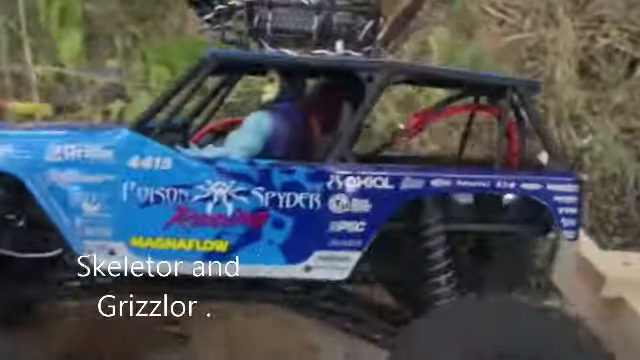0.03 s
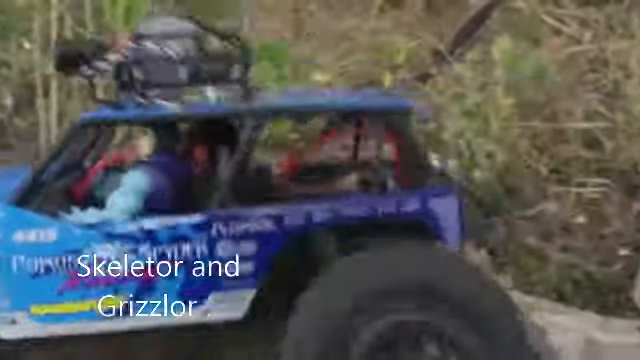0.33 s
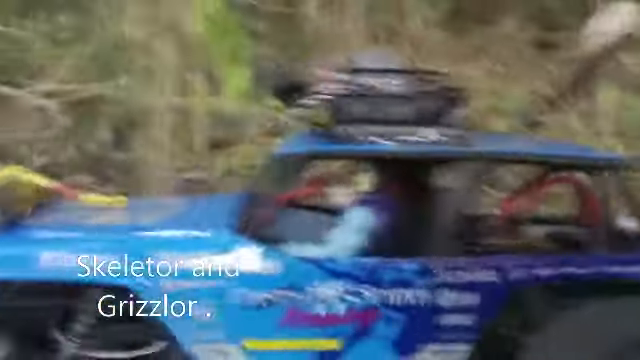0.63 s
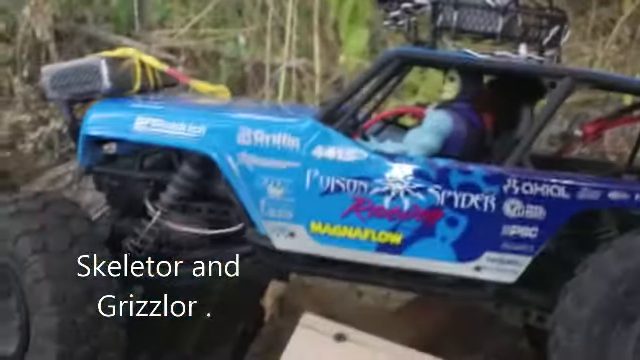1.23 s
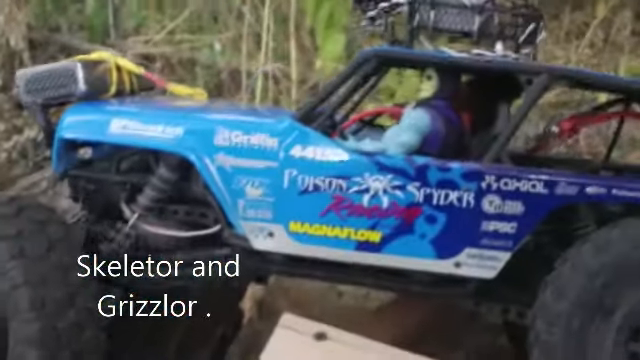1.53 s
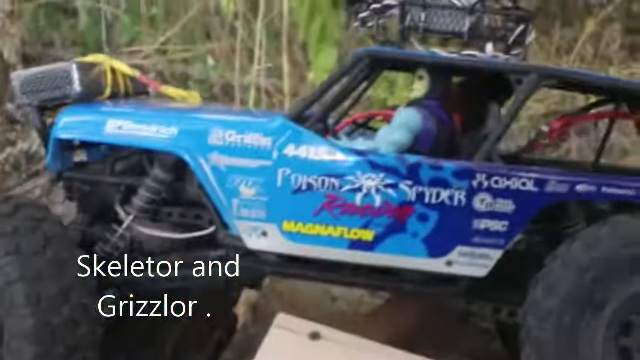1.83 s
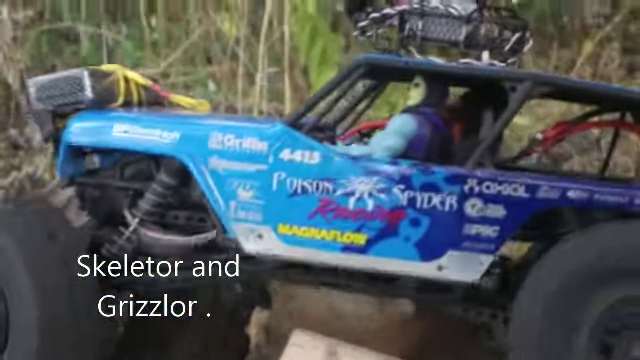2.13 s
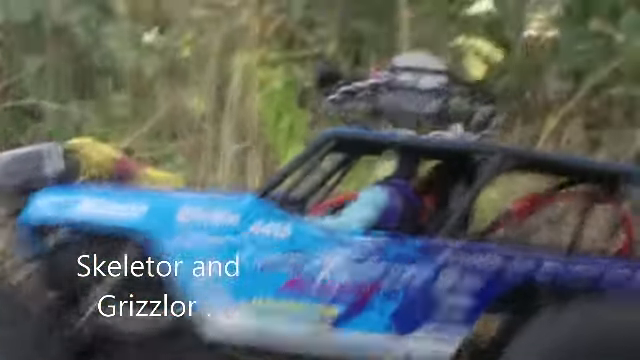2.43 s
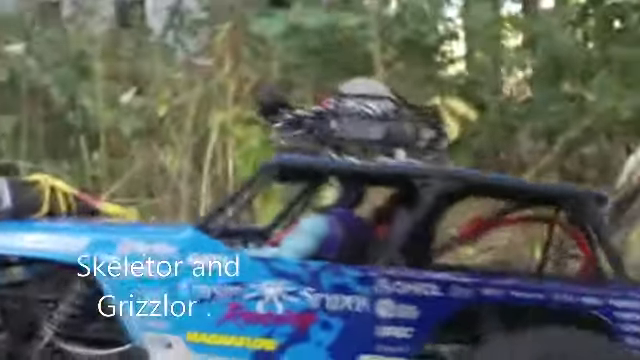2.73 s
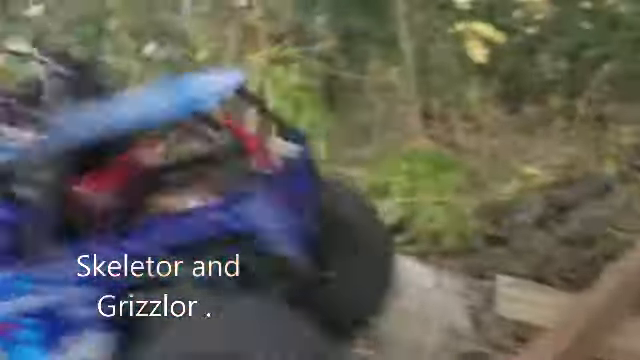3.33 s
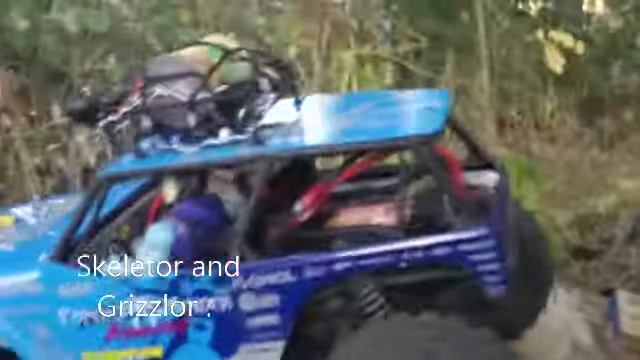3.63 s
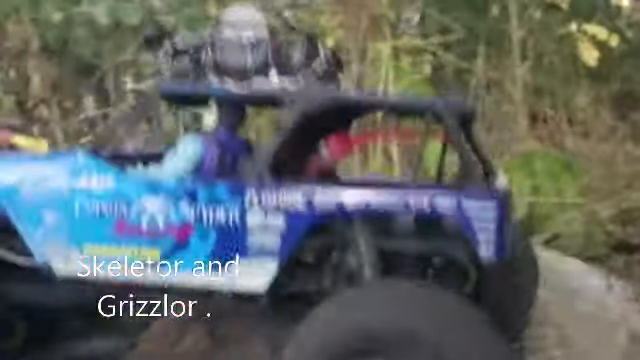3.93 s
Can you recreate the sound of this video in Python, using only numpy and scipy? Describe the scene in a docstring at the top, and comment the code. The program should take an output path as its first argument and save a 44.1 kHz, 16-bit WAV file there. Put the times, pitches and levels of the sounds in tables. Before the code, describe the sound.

A radio-controlled truck clatters over logs outdoors, close by. Short gear whirrs, tyre scrubbing and hollow knocks fill the first second. It then rests until about 2 seconds, leaving a quiet hush, a thin whine and one faint squeak. Knocking resumes with light rustling, a small clink at 2.6 and sharp snaps near 2.9. The gears whirr again at 3 and 3.8, before final knocks and a brief tyre judder.

```python
"""Outdoors, a radio-controlled crawler climbs over logs close to the microphone.
Its meshing gears whirr in short bursts of throttle and its speed controller whines. Impacts on the
wood ring the chassis; wood and plastic snap, tyres scrub and rumble, dry litter rustles.
It rests for a second over a quiet hush, with one faint squeak, then climbs on:
a small metal part clinks, and at the end a tyre judders by stick-slip friction."""
import sys
import numpy as np
from scipy import signal
from scipy.fft import rfft, irfft
from scipy.io import wavfile
from scipy.ndimage import uniform_filter1d

SR = 44100
rng = np.random.default_rng(int(sys.argv[2]) if len(sys.argv) > 2 else 0)


def log_audio(samples):
    """Write samples as a 16-bit WAV file to the path given in sys.argv[1]."""
    # one column per channel
    frames = np.atleast_2d(samples).T
    # limit to full scale, then quantise
    limited = np.clip(frames, -1, 1)
    pcm = np.round(limited * 32767).astype(np.int16)
    wavfile.write(sys.argv[1], SR, pcm)


N = 176400


def undb(db):
    """Decibels to amplitude ratio."""
    return 10 ** (np.asarray(db) / 20)


def unit(x):
    """Normalisation to rms 1."""
    return x / np.sqrt(np.mean(x ** 2) + 1e-20)


def colour(x, points):
    """Spectral shaping by a curve of (Hz, dB) points."""
    hz, db = np.array(points).T
    f = np.maximum(np.fft.rfftfreq(len(x), 1 / SR), 1)
    return irfft(rfft(x) * undb(np.interp(np.log(f), np.log(hz), db)), len(x))


def band(x, lo_hz, hi_hz):
    """Causal band-pass filtering."""
    return signal.sosfilt(signal.butter(2, [lo_hz, hi_hz], "band", fs=SR, output="sos"), x)


def walk(per_s):
    """Smoothed random steps: a slow wander of rms 1."""
    hold = max(int(SR / per_s), 1)
    steps = np.repeat(rng.standard_normal(N // hold + 1), hold)
    return unit(uniform_filter1d(uniform_filter1d(steps, hold), hold)[:N])


def fade(t, t60):
    """Exponential decay, by 60 dB in t60 seconds."""
    return np.exp(-np.log(1000) * t / t60)


def add(out, start_s, x):
    """Superposition of a short sound at its start time."""
    i = int(start_s * SR)
    out[i:i + len(x)] += x[:max(N - i, 0)]


def grains(per_s, spread_db):
    """Shot noise: random clicks of uneven size."""
    size = undb(spread_db * np.minimum(rng.exponential(size=N), 4))
    return unit((rng.random(N) < per_s / SR) * size * rng.choice([-1, 1], N))


# One list per burst of throttle. Each row: time in seconds, mesh frequency in Hz, relative level in dB.
THROTTLE_BURSTS = [
    [(0, 537.6, -44), (.03, 495.3, -37), (.062, 382.3, -46), (.11, 478, -43.5), (.15, 504, -46),
     (.22, 649, -33.5), (.255, 767, -40), (.282, 873, -37.5), (.325, 785, -36)],
    [(.745, 785.5, -45.5), (.765, 800, -33), (.79, 736, -38.5), (.825, 528, -37)],
    [(2.995, 845.6, -40), (3.012, 915, -29.5), (3.03, 880, -34), (3.053, 977, -32.5), (3.088, 791.4, -39),
     (3.118, 978.5, -29), (3.145, 1091, -41), (3.177, 1244, -31.5), (3.22, 1179, -34), (3.28, 874, -48)],
    [(3.75, 424, -50), (3.785, 462.4, -57), (3.815, 594.6, -46), (3.847, 764, -41), (3.915, 798, -38.5)],
]
# Each row, one per burst: lift of the fundamental in dB, gain of the tooth rattle in dB.
BURST_TONE = [(-2, -12), (0.5, -8), (1.5, -19), (9, -9)]
# Each entry: relative level of a mesh harmonic in dB, from the fundamental up.
MESH_HARMONICS_DB = [0, 1, -4, -7.5, -14, -19]
# Gearbox response. Each row: frequency in Hz, gain in dB.
GEARBOX_RESPONSE = [(300, -30), (560, 1), (700, -2), (950, 3), (1350, 7), (1620, 0), (1900, -2),
                    (2150, -7.5), (2520, -1), (3200, -5.5), (3700, -5), (4300, -17.5), (4800, -3),
                    (5200, -18), (8000, -13)]
# Each entry: offset of a sideband from the switching tone, in multiples of the rotor's speed.
BUZZ_ORDERS = [-4, -3, -2, -1, 1]
PINION_TEETH, WOBBLE_RAD, TOOTH_SCATTER_RAD = 7, .19, .09
GEAR_DB, GEAR_ROUGHNESS, GEAR_JITTER, GEAR_FADE_S = -4, .43, .009, .015
SWITCHING_HZ, BUZZ_DB = 5912, -56


def geared_motor(t):
    """Gear-mesh harmonics, phase-modulated by a wobbling pinion; teeth rattle and the windings buzz."""
    out = np.zeros(N)
    box_hz, box_db = np.array(GEARBOX_RESPONSE).T
    switching = 2 * np.pi * SWITCHING_HZ * t
    for burst, (lift_db, teeth_db) in zip(THROTTLE_BURSTS, BURST_TONE):
        times, hz, db = np.array(burst).T
        pitch = np.interp(t, times, hz) * (1 + GEAR_JITTER * walk(250))
        phase = 2 * np.pi * np.cumsum(pitch) / SR
        phase += TOOTH_SCATTER_RAD * walk(900)  # uneven teeth blur the high harmonics
        rotor = phase / PINION_TEETH
        wobble = WOBBLE_RAD * (np.sin(rotor) + walk(40) * np.sin(2 * rotor) / 2)
        mesh = np.zeros(N)
        for k, harmonic_db in enumerate(MESH_HARMONICS_DB, 1):
            response_db = np.interp(np.log(k * pitch), np.log(box_hz), box_db)
            gain = undb(harmonic_db + lift_db * (k == 1) + response_db)
            mesh += gain * (1 + GEAR_ROUGHNESS * walk(300)) * np.sin(k * (phase + wobble))
        contacts = rng.standard_normal(N) * (1 + np.cos(phase)) * undb(2.3 * walk(250))
        teeth = unit(colour(contacts, GEARBOX_RESPONSE))
        gears = undb(np.interp(t, times, db)) * (undb(GEAR_DB) * mesh + undb(teeth_db) * teeth)
        buzz = unit(sum((1 + walk(60) / 2) * np.sin(switching + k * rotor) for k in BUZZ_ORDERS))
        outside_burst_s = np.maximum(times[0] - t, 0) + np.maximum(t - times[-1], 0)
        out += np.exp(-outside_burst_s / GEAR_FADE_S) * (gears + undb(BUZZ_DB) * buzz)
    return out


# Tyres on bark. Each row: time in seconds, relative levels of the scrub and of the rumble in dB.
TYRE_LEVELS = [(0, -46, -56.5), (.3, -40, -56.5), (.36, -29.5, -46), (0.45, -44.5, -52),
               (.55, -34.5, -47.5), (.64, -45, -60), (.78, -39.5, -53.5), (.98, -42.5, -57),
               (1.12, -58, -59), (1.95, -55.5, -61.5), (2.11, -35, -56), (2.22, -53, -53.5),
               (2.52, -43, -69), (2.7, -40, -50), (2.8, -42.5, -56), (3.0, -31.5, -47), (3.15, -40, -58.5),
               (3.31, -36.5, -51.5), (3.42, -44.5, -53.5), (3.58, -52.5, -61), (3.8, -45.5, -59),
               (4, -34.5, -49.5)]
# Spectra of the scrub and the rumble. Each row: frequency in Hz, gain in dB.
SCRUB_SPECTRUM = [(300, -20.5), (480, 5.5), (750, -2.5), (1050, 5.5), (1500, -10.5), (2200, -10.5),
                  (3500, -20.5), (7000, -19.5), (15000, -29.5)]
RUMBLE_SPECTRUM = [(40, -20), (100, 3.5), (170, 7.5), (300, 2.5), (420, -6), (800, -20)]
SCRUB_GAIN_DB, RUMBLE_GAIN_DB = -5, 1.5


def tyres(t):
    """Rolling and friction noise: tread blocks patter and scrub on bark, and the soft tyres rumble."""
    times, scrub_db, rumble_db = np.array(TYRE_LEVELS).T
    tread = grains(per_s=500, spread_db=1.5) + .46 * rng.standard_normal(N)
    scrub = unit(colour(tread, SCRUB_SPECTRUM))
    scrub *= undb(np.interp(t, times, scrub_db) + SCRUB_GAIN_DB)
    rumble = unit(colour(rng.standard_normal(N), RUMBLE_SPECTRUM))
    rumble *= undb(np.interp(t, times, rumble_db) + RUMBLE_GAIN_DB)
    return scrub + rumble


# Spectrum of the background. Each row: frequency in Hz, gain in dB.
HUSH_SPECTRUM = [(15, -50), (25, -14.5), (331, -3.5), (509, -4.5), (741, -7), (945, -7.5), (4260, -17),
                 (5730, -17), (7910, -14), (9300, -17), (15500, -23.5)]
HUSH_DB = -50


def hush():
    """Broadband noise floor: nearly steady outdoor air and microphone hiss."""
    return undb(HUSH_DB + .92 * walk(6.87)) * unit(colour(rng.standard_normal(N), HUSH_SPECTRUM))


# Chassis and wheels strike the logs.
# Each row: start in seconds, then relative levels in dB of four parts: body, thump, clack and crack.
KNOCKS = [(0.327, -7.5, -21.5, -24, -34.5), (0.393, -25, -46, -38, -48), (0.487, -27.5, -60, -40.5, -47),
          (0.518, -18.5, -42, -38.5, -45), (0.55, -24, -39, -42, -48), (0.696, -32, -49, -43.5, -50),
          (0.833, -13.5, -37.5, -27, -34.5), (0.903, -10.5, -36, -27.5, -32.5),
          (0.966, -14.5, -43.5, -30, -36), (2.064, -15, -36.5, -27, -33),
          (2.162, -10.5, -38.5, -23.5, -26.5), (2.565, -15.5, -42.5, -29.5, -38.5),
          (2.595, -19.5, -49, -32.5, -38.5), (2.659, -20.5, -51, -41.5, -50),
          (2.834, -11.5, -38.5, -23, -30), (2.957, -10, -42.5, -23.5, -29.5), (3.027, -20, -42, -40, -53),
          (3.207, -17, -41.5, -33, -43), (3.34, -22, -57, -38, -41.5), (3.459, -20, -46, -32.5, -39),
          (3.923, -16.5, -49, -28.5, -36.5), (3.937, -18, -41, -29.5, -55)]
# Each row, one per part: lower and upper band edge in Hz.
KNOCK_BANDS = [(425, 1180), (210, 530), (1428, 2530), (3850, 9060)]
# Each row, one per part: gain in dB, t60 of the rattle in seconds, rattle against modes in dB.
KNOCK_PARTS = [(-12, 0.068, -2), (0.5, 0.092, 0), (-0.5, .03, -8), (-3, 0.027, 9)]
# Modes of chassis and shell. Each row: frequency in Hz, relative level in dB, t60 in seconds.
SHELL_MODES = [(240, -11, 0.14), (300, -8, 0.094), (423, -7.5, 0.098), (495, 1.5, 0.048), (619, -2, 0.061),
               (770, -4, 0.022), (956, -1.5, 0.037), (1243, 0, 0.063), (1537, 5.5, 0.053),
               (1730, 11, 0.031), (1900, 3.5, 0.054), (2320, -12.5, 0.027)]
KNOCK_RISE_S, KNOCK_LAG_S, KNOCK_SPAN_S = .0013, .0006, .019
MODE_SCATTER_DB, MODE_DETUNE, TAIL_DB, TAIL_T60_S = 3.5, .019, -29.5, .26


def knocks(t):
    """Modal ringing: each blow excites the shell and shakes loose parts, coloured by where it lands."""
    out, age = np.zeros(N), t[:N // 12]
    hz, db, t60 = np.array(SHELL_MODES).T[:, :, None]
    rise = 1 - np.exp(-age / KNOCK_RISE_S)
    span_gain = np.sqrt(KNOCK_SPAN_S / age[-1])  # gives the energy of rms 1 held for the span
    for start, *levels in KNOCKS:
        size, detune = rng.standard_normal((2, len(SHELL_MODES), 1))
        strength = rng.choice([-1, 1], size.shape) * undb(db + MODE_SCATTER_DB * size)
        mode_hz = hz * (1 + MODE_DETUNE * detune)
        ring = np.sum(strength * fade(age, t60) * np.sin(2 * np.pi * mode_hz * age), axis=0)
        noise = rng.standard_normal(len(age))
        for edges, level_db, (gain_db, rattle_t60, rattle_db) in zip(KNOCK_BANDS, levels, KNOCK_PARTS):
            rattle = noise * (fade(age, rattle_t60) + undb(TAIL_DB) * fade(age, TAIL_T60_S))
            part = unit(band(rise * ring, *edges)) + undb(rattle_db) * unit(band(rise * rattle, *edges))
            add(out, start + KNOCK_LAG_S, unit(part) * span_gain * undb(level_db + gain_db))
    return out


# Dry snaps and thuds. Each row: start in seconds, relative level in dB, pitch in Hz, t60 in seconds,
# click against ring in dB.
SNAPS = [(0.3292, -15, 1270, 0.0054, 0), (0.65, -29.5, 1440, .016, -5), (2.704, -31, 460, .03, -15),
         (2.7919, -24.5, 790, 0.017, -7), (2.911, -15, 580, 0.017, -32), (2.9417, -6.5, 1050, 0.0074, 5),
         (3.924, -16.5, 2480, 0.024, -8), (3.9243, -17.5, 2830, 0.02, -16)]
CLICK_HZ, CLICK_T60_S, CLICK_CRACK_DB = 3830, .00076, -16.5


def snaps(t):
    """Heavily damped vibration: contacts of wood and plastic ring briefly under a sharp click."""
    out, age = np.zeros(N), t[:N // 80]
    for start, db, hz, t60, click_db in SNAPS:
        crack = unit(band(rng.standard_normal(len(age)), 3100, 14000)) * fade(age, t60=.004)
        pulse = np.sin(2 * np.pi * CLICK_HZ * age) * fade(age, CLICK_T60_S)
        click = undb(CLICK_CRACK_DB) * crack - pulse
        ring = np.sin(2 * np.pi * hz * age) * fade(age, t60)
        add(out, start, undb(db) * (ring + undb(click_db) * click))
    return band(out, 280, 11000)


# Whine of the speed controller. Each row: time in seconds, rms level of the fundamental in dB.
WHINE_LEVELS = [(.52, -72), (.62, -64), (.9, -75), (1.04, -61.5), (1.4, -68.5), (1.95, -74), (2.02, -58.5),
                (2.25, -58.5), (2.95, -63.5), (3.1, -67), (3.55, -63.5), (3.8, -74)]
WHINE_WAVER_HZ, WHINE_FLUTTER_DB, WHINE_OCTAVE_DB = 3, 1.5, -9.5


def controller(t):
    """Periodic switching: a thin whine and its octave swell and fade, clearest between throttle bursts."""
    times, db = np.array(WHINE_LEVELS).T
    phase = 2 * np.pi * np.cumsum(SWITCHING_HZ + WHINE_WAVER_HZ * walk(50.2)) / SR
    rms = undb(np.interp(t, times, db) + WHINE_FLUTTER_DB * walk(30))
    return np.sqrt(2) * rms * (np.sin(phase) + undb(WHINE_OCTAVE_DB) * np.sin(2 * phase))


# Swells of rustling. Each row: centre in seconds, half length in seconds, level in dB.
RUSTLES = [(0.59, 0.028, -45), (2.308, 0.0078, -42), (2.36, 0.033, -39), (3.364, 0.03, -43.5)]
# Spectrum of the crackle. Each row: frequency in Hz, gain in dB.
LITTER_SPECTRUM = [(600, -3.5), (1600, 9), (2600, -1.5), (3700, 1), (5000, -5.5), (9000, -0.5),
                   (15000, -18)]


def litter(t):
    """Shot noise: dry litter crushed under the tyres gives short swells of fine crackle."""
    swell = sum(undb(db) * np.exp(-((t - centre) / half) ** 2) for centre, half, db in RUSTLES)
    return swell * unit(colour(grains(per_s=900, spread_db=3.5), LITTER_SPECTRUM))


# A faint high squeak. Its row: centre in seconds, half length in seconds, pitch in Hz,
# glide as a share of the pitch per second, relative level in dB.
SQUEAK = [(1.521, 0.018, 9450, -2, -47)]


def squeak(t):
    """A bird chirps: a thin, scratchy high tone that breaks up as it comes and goes."""
    waver = 1 + .035 * walk(1200)
    grip = np.abs(walk(150))
    out = np.zeros(N)
    for centre, half, hz, glide, db in SQUEAK:
        pitch = hz * waver * (1 + glide * np.clip(t - centre, -2 * half, 2 * half))
        swell = undb(db) * np.exp(-((t - centre) / half) ** 2)
        out += swell * np.sin(2 * np.pi * np.cumsum(pitch) / SR)
    return grip * out


# Modes of a small metal part. Each row: frequency in Hz, level in dB.
CLINK_MODES = [(3359, -34), (3725, -39), (5453, -39), (10490, -41)]
CLINK_START_S, CLINK_T60_S = 2.598, .042


def clink(t):
    """Free vibration: a jolted metal part rings briefly in its inharmonic modes."""
    out, age = np.zeros(N), t[:N // 40]
    ring = sum(undb(db) * np.sin(2 * np.pi * hz * age) for hz, db in CLINK_MODES)
    add(out, CLINK_START_S, fade(age, CLINK_T60_S) * ring)
    return out


JUDDER_START_S, JUDDER_RISE_S, JUDDER_LENGTH_S = 3.976, .0026, .0092
SLIP_HZ, JUDDER_DB, TICK_DB = 874, -15.5, -27


def judder(t):
    """Stick-slip friction: a tyre catches on the wood with a tick, judders a moment and rings out."""
    out, age = np.zeros(N), t[:N // 40]
    phase = 2 * np.pi * np.cumsum(SLIP_HZ * (1 + .13 * walk(700)[:len(age)])) / SR
    grip = np.minimum(age / JUDDER_RISE_S, 1) * fade(np.maximum(age - JUDDER_LENGTH_S, 0), t60=.035)
    slips = np.sin(phase) * (1 + .89 * np.cos(phase / 2))  # modulated at half the slip rate
    tick = unit(band(rng.standard_normal(len(age)), 1200, 4200)) * fade(age, t60=.024)
    add(out, JUDDER_START_S, undb(JUDDER_DB) * grip * slips + undb(TICK_DB) * tick)
    return out


def scene():
    """Superposition of the crawler and its surroundings, in mono."""
    t = np.arange(N) / SR
    mix = (geared_motor(t) + tyres(t) + hush() + knocks(t) + snaps(t)
           + controller(t) + litter(t) + squeak(t) + clink(t) + judder(t))
    return mix[None]


# Notches of the recorder's filter. Each row: centre in Hz, width in Hz.
RECORDER_NOTCHES = [(7900, 2030), (10960, 670)]
CUTOFF_HZ = 15600


def record(dry):
    """The recorder: its filter cuts two narrow notches in the treble, with a steep cut at the top."""
    for hz, width_hz in RECORDER_NOTCHES:
        dry = signal.lfilter(*signal.iirnotch(hz, hz / width_hz, fs=SR), dry)
    return signal.sosfilt(signal.ellip(8, .2, 70, CUTOFF_HZ, fs=SR, output="sos"), dry)


dry = scene()
out = record(dry)
log_audio(out)
```